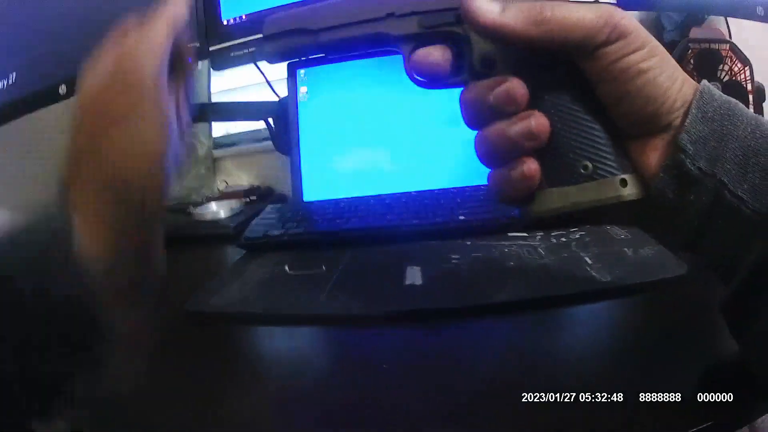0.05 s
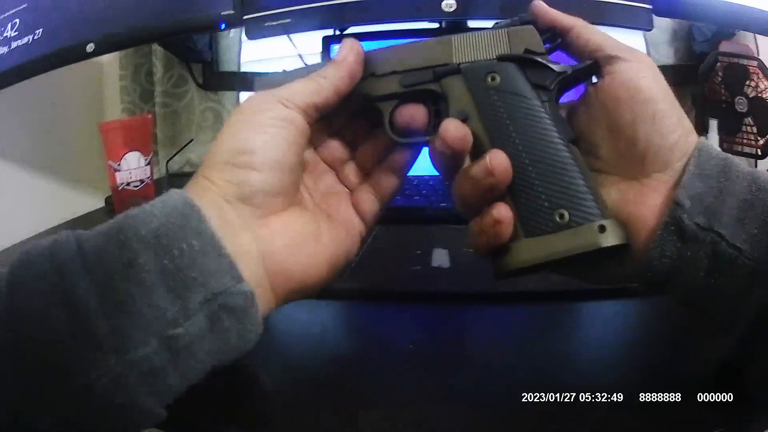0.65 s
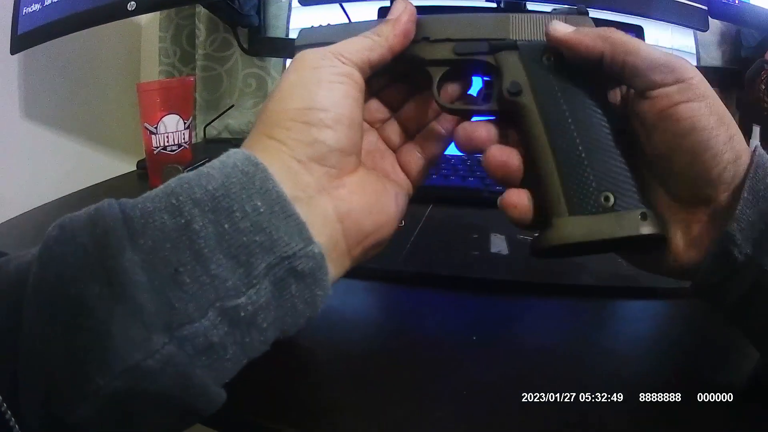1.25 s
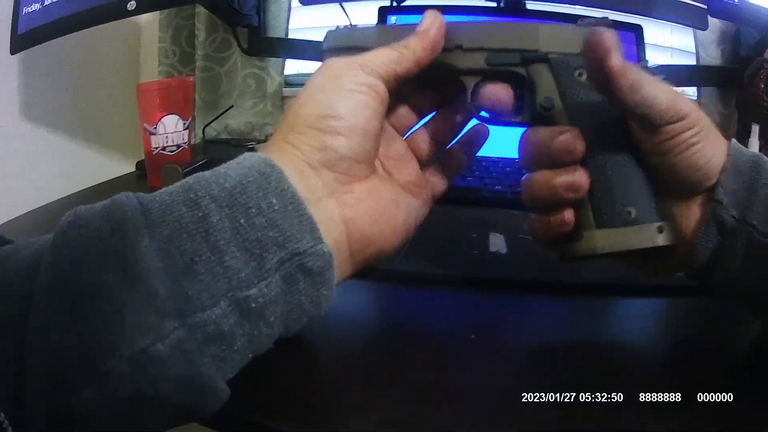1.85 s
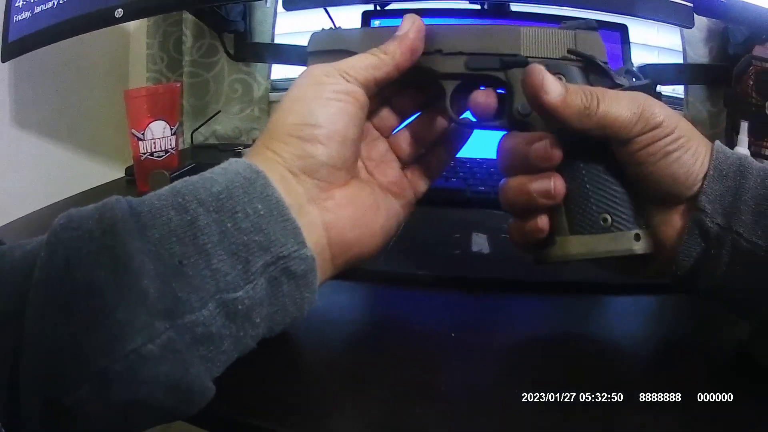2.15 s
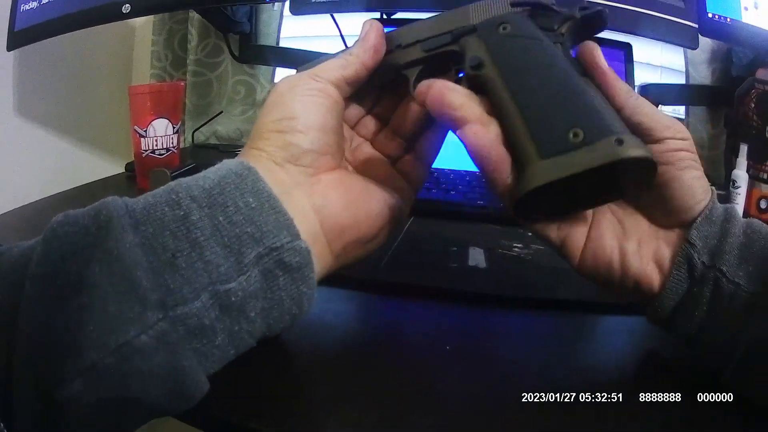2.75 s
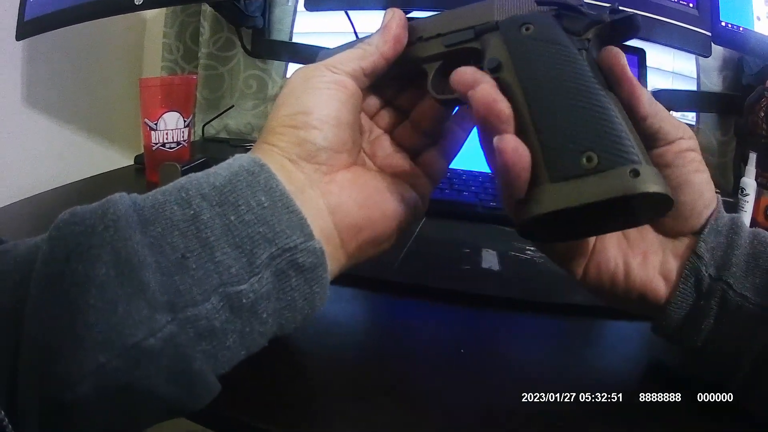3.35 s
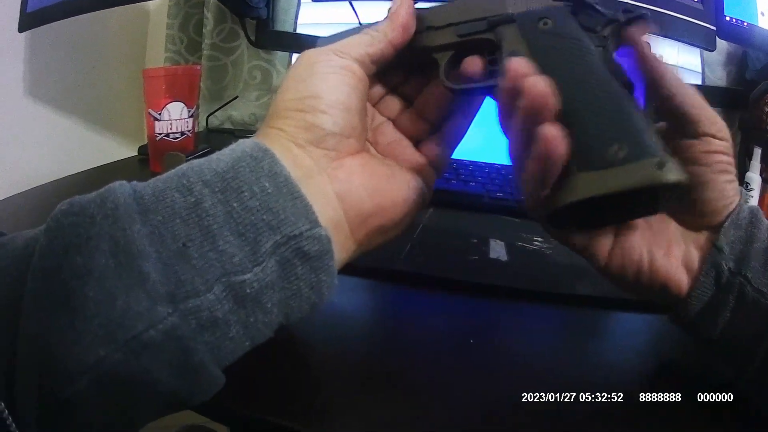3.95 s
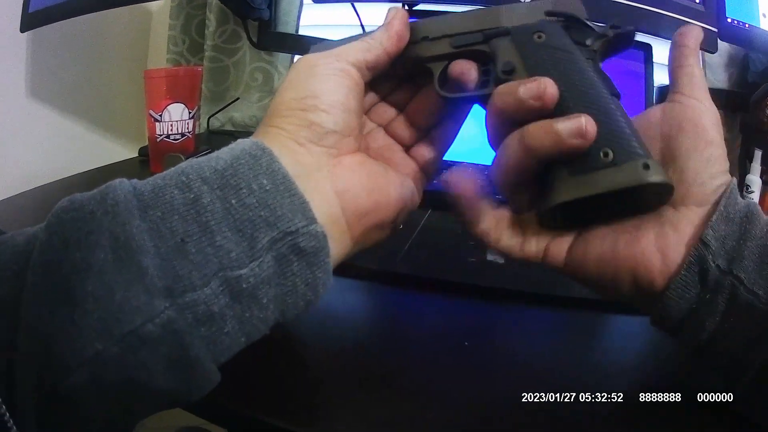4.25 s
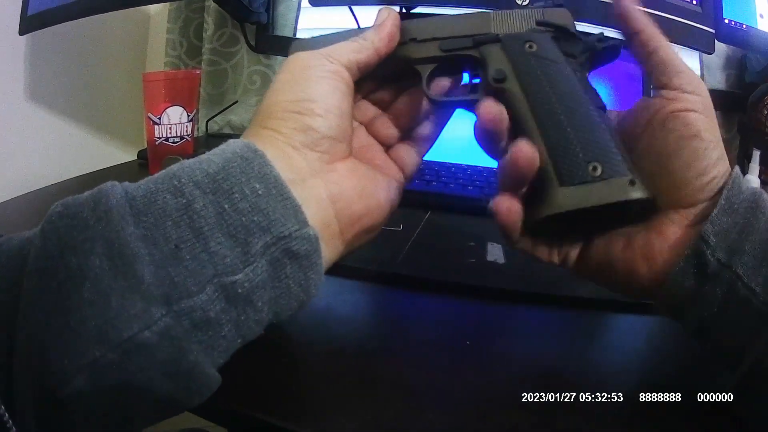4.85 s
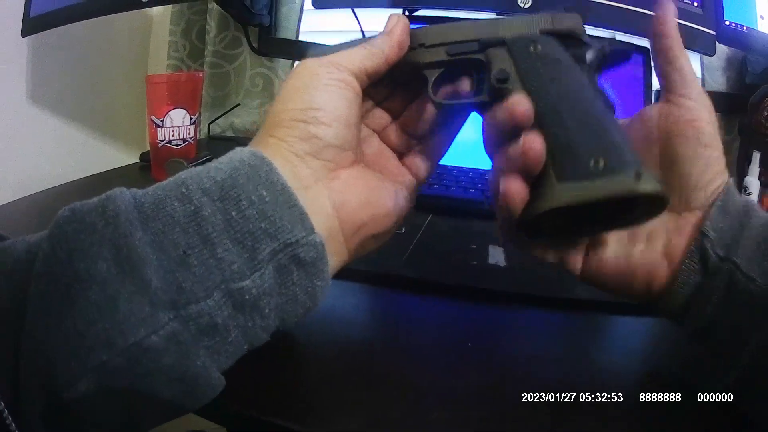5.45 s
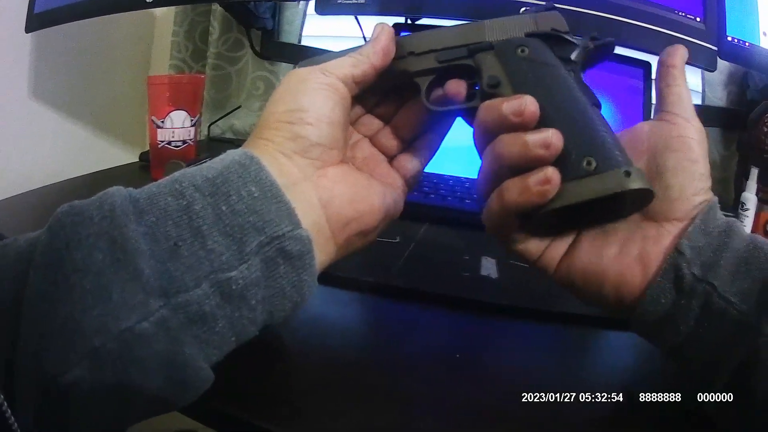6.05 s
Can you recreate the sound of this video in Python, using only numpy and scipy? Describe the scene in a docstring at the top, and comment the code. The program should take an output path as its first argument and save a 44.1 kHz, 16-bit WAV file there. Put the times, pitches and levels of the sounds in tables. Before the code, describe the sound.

Indoors, a handgun's slide crashes forward so near the microphone that it briefly overloads. The hammer is drawn back with a faint high squeak, and two hard snaps come with a little spring twang between them. Small metal parts keep clicking and ticking unevenly, with soft rubbing of fingers and cloth. Near the end another snap cracks out, trailed by light ticks. A low electrical hum and soft room noise continue throughout.

```python
"""A steel pistol is worked by hand close to a small camera, over a faint mains hum and the rush of a room.
First the slide slams home and bounces; the impact overloads the microphone and sets the room ringing.
Then the hammer is thumbed back with a thin squeak, a spring twangs, and the hammer drops.
Safety, trigger and magazine tick as the grip shifts; one more blow falls near 5.2 s, then a few ticks.
Each impact excites damped modes of the steel; friction of skin, cloth and metal gives the noise between."""
import sys
import numpy as np
from scipy import signal
from scipy.fft import rfft, irfft
from scipy.io import wavfile
from scipy.ndimage import uniform_filter1d

SR = 44100
rng = np.random.default_rng(int(sys.argv[2]) if len(sys.argv) > 2 else 0)


def dump_mix(stems):
    """Bounce the given channels to the path in sys.argv[1] as a 16-bit WAV at rate SR."""
    frames = np.atleast_2d(stems).T  # one column per channel
    limited = np.clip(frames, -1, 1)  # hard clip at full scale
    pcm = np.round(limited * 32767).astype(np.int16)
    wavfile.write(sys.argv[1], SR, pcm)


N = 269230
TIME = np.arange(N) / SR
SHORT = TIME[:SR // 8]   # time axis of one impact
CUTOFF_HZ = 12900


def from_db(db):
    """Amplitude ratio of a level in decibels."""
    return 10 ** (np.asarray(db) / 20)

def unit_energy(x):
    """Normalisation to an energy of one."""
    return x / np.sqrt(np.sum(x ** 2) + 1e-20)

def at_hz(points, hz):
    """Interpolation on a logarithmic frequency axis."""
    f, value = np.transpose(points)
    return np.interp(np.log(np.maximum(hz, 1)), np.log(f), value)

def add(out, s, sound):
    """Superposition of a sound that starts at s seconds."""
    i = max(round(s * SR), 0)
    out[i:i + len(sound)] += sound[:N - i]

def noise(spectrum, size):
    """Spectral shaping of white noise, scaled to an rms of one."""
    gain = from_db(at_hz(spectrum, np.fft.rfftfreq(size, 1 / SR)))
    x = irfft(rfft(rng.standard_normal(size)) * gain, size)
    return x / np.std(x)

def roughness(size, grain_samples):
    """Surface roughness as a moving average of noise, with an rms of one."""
    x = uniform_filter1d(rng.standard_normal(size), size=grain_samples)
    return x / np.std(x)

def decay(t60, t=SHORT):
    """Exponential damping: 60 dB in t60 seconds."""
    return np.exp(-np.log(1000) * t / max(t60, 1e-3))

def onset(rise_s):
    """Finite contact time: the force builds over a fraction of a millisecond."""
    return 1 - np.exp(-(SHORT / rise_s) ** 2)

def ring(modes, spread_db, detune):
    """Modal superposition; grip and point of contact vary each mode's strength and pitch."""
    out = np.zeros(len(SHORT))
    for hz, db, t60 in modes:
        strength, shift, phase = rng.uniform(-1, 1, 3)
        mode = np.sin(2 * np.pi * hz * (1 + detune * shift) * SHORT + np.pi * phase)
        out += from_db(db + spread_db * strength) * decay(t60) * mode
    return unit_energy(out)

def crack(spectrum, t60):
    """Modal overlap: countless high modes merge into noise, damped by the hands in milliseconds."""
    return unit_energy(noise(spectrum, len(SHORT)) * decay(t60))


# mains harmonics: f/Hz, rms level/dB
MAINS_LINES = [(119.9, -46.5), (239.8, -61.5), (359.7, -71)]

def hum():
    """Electrical interference: the electronics pick up harmonics of the mains."""
    return sum(np.sqrt(2) * from_db(db) * np.sin(2 * np.pi * (hz * TIME + rng.random()))
               for hz, db in MAINS_LINES)

# ambient spectrum: f/Hz, relative density level/dB
AIR_SPECTRUM = [(20, -15), (42, -2.5), (65, -6), (100, -5.5), (180, 0), (260, -4), (400, -9), (600, -10.5),
                (1000, -17), (2200, -20.5), (4000, -30.5), (8000, -29), (12500, -30)]

def room_rush(rms_db=-59.5):
    """Stationary noise: the soft, low rush of the room."""
    return from_db(rms_db) * noise(AIR_SPECTRUM, N)

# reverberation time: f/Hz, t60/s
ROOM_T60 = [(200, 0.32), (900, 0.74), (2000, 0.71), (4500, 0.64), (8000, 0.61), (13000, 0.31)]
# spectrum of the tail at its start: f/Hz, relative level/dB
ROOM_SPECTRUM = [(100, 2.5), (400, 1), (1000, -1), (2200, 1.5), (4500, -2), (8000, -3), (13000, 2.5)]

def room_tail(build_s=0.0059):
    """Diffuse field: each band decays at its own rate, and the middle outlasts bass and treble."""
    t = TIME[:SR]
    hz = np.fft.rfftfreq(SR, 1 / SR)
    spectrum = rfft(rng.standard_normal(SR)) * from_db(at_hz(ROOM_SPECTRUM, hz))
    edges = np.linspace(np.sqrt(60), np.sqrt(CUTOFF_HZ), num=17) ** 2
    response = np.zeros(SR)
    for low, high in zip(edges, edges[1:]):
        band = irfft(spectrum * ((hz >= low) & (hz < high)), SR)
        response += band * decay(at_hz(ROOM_T60, np.sqrt(low * high)), t)
    return unit_energy(response * (1 - np.exp(-t / build_s)))

# early reflections off desk and screen: delay/s, level/dB re the direct sound
REFLECTIONS = [(0.0103, -24), (.0245, -28), (0.0274, -33.5)]

def room(direct, directions=3, tail_db=-21.5):
    """Reflection and reverberation; the gun radiates differently each way, which smooths the tail."""
    out = direct.copy()
    for delay, db in REFLECTIONS:
        add(out, delay, from_db(db) * direct)
    radiated = [(blows() + clicks()) / np.sqrt(directions) for _ in range(directions)]
    tail = sum(signal.fftconvolve(x, room_tail())[:N] for x in radiated)
    return out + from_db(tail_db) * tail

# shifts of the grip: start t/s, end t/s, finger level/dB, sleeve level/dB
GRIP_SHIFTS = [(0, .2, -42.5, -57), (0.582, 0.86, -60.5, -55), (1.004, 1.704, -62, -70.5),
               (2.41, 2.437, -53.5, -62), (4.5, 4.672, -63.5, -72), (5.745, 6.105, -74.5, -59)]

def movement(part, rest_db, fade_db_per_s):
    """Friction follows motion: its gain swells into each shift, holds, and sinks back to rest."""
    level_db = np.full(N, rest_db)
    for start, end, finger_db, sleeve_db in GRIP_SHIFTS:
        held_db = {"fingers": finger_db, "sleeves": sleeve_db}[part]
        away_s = np.abs(TIME - np.clip(TIME, start, end))
        level_db = np.maximum(level_db, held_db - fade_db_per_s * away_s)
    return from_db(level_db)

# brushing cloth: f/Hz, relative density level/dB
SLEEVE_SPECTRUM = [(100, -32), (300, -10.5), (400, 4), (550, -12.5), (1500, -25), (6000, -44)]

def sleeves():
    """Friction of soft cloth: low noise as the arms move."""
    return movement("sleeves", rest_db=-66.5, fade_db_per_s=66) * noise(SLEEVE_SPECTRUM, N)

# squeak as the hammer is thumbed back: t/s, f/Hz, level/dB
SQUEAK_PATH = [(0.50, 8800, -94), (0.54, 9600, -60.5), (0.61, 11300, -66.5), (0.68, 10900, -75),
               (0.75, 11450, -68), (0.80, 10300, -62), (0.86, 10750, -58.5), (0.89, 10750, -100)]

def squeak(grain, waver=0.00824):
    """Frequency modulation: the grain of the friction makes one thin tone waver."""
    s, hz, db = np.transpose(SQUEAK_PATH)
    pitch = np.interp(TIME, s, hz) * (1 + waver * grain)
    envelope = np.interp(TIME, s, from_db(db), left=0, right=0)
    return envelope * np.sin(2 * np.pi * np.cumsum(pitch) / SR)

# skin rubbing on the gun: f/Hz, relative density level/dB
RUB_SPECTRUM = [(200, -11.5), (700, -7.5), (1050, 4), (1400, -12), (2300, 0.5), (3500, -5), (7000, -6.5),
                (10000, -13), (13000, -26.5)]

def fingers(grain_db=2):
    """Friction of skin: one roughness modulates the amplitude of both rub and squeak."""
    grain = roughness(N, grain_samples=130)
    rub = movement("fingers", rest_db=-69.5, fade_db_per_s=158) * noise(RUB_SPECTRUM, N)
    return from_db(grain_db * grain) * (rub + squeak(grain))

# steel meeting steel, also in twangs and clicks: f/Hz, relative density level/dB
CONTACT_SPECTRUM = [(150, -25.5), (400, -12.5), (1800, -20.5), (3500, -11.5), (5500, -1.5), (6800, 7),
                    (9000, 1.5), (12000, -0.5), (15000, -13.5)]
# parts sliding on each other: start t/s, end t/s, level/dB before the grit
SCRAPES = [(2.385, 2.437, -53.5), (4.607, 4.64, -51)]

def scrapes(grit_db=9.0):
    """Sliding friction of steel on steel: a short, gritty hiss."""
    out = np.zeros(N)
    for start, end, db in SCRAPES:
        size = max(round((end - start) * SR), 200)
        gain = from_db(db + grit_db * roughness(size, grain_samples=40))
        add(out, start, gain * noise(CONTACT_SPECTRUM, size) * signal.windows.tukey(size))
    return out

def lead_in_hiss(lead_s=0.0026, click_hiss_db=-23.0, blow_hiss_db=-30):
    """Exponential growth: a brief, faint hiss swells just ahead of each click and blow."""
    out = np.zeros(N)
    for events, hiss_db in ((CLICKS, click_hiss_db), (BLOWS, blow_hiss_db)):
        for s, db, *_ in events:
            swell = crack(CONTACT_SPECTRUM, t60=5 * lead_s)[:round(s * SR)][::-1]
            add(out, s - len(swell) / SR, from_db(db + hiss_db) * swell)
    return out

# modes of the spring: f/Hz, relative level/dB, t60/s
SPRING_MODES = [(1050, -8.5, 0.11), (2600, -7.5, 0.088), (4400, 6.5, 0.026), (5850, 6.5, 0.033),
                (6700, -22, 0.048), (8200, 3, 0.037), (9500, -9, 0.087)]
# a part settles against the spring: t/s, energy level/dB, ring level/dB re the tick
TWANGS = [(1.0421, 3, 4), (2.8414, -8, 9)]

def twangs():
    """Free vibration: a bright tick leaves a spring ringing briefly."""
    out = np.zeros(N)
    for s, db, ring_db in TWANGS:
        tick = crack(CONTACT_SPECTRUM, t60=0.01)
        spring = from_db(ring_db) * ring(SPRING_MODES, spread_db=0.5, detune=.002)
        add(out, s, from_db(db) * unit_energy((tick + spring) * onset(rise_s=0.00034)))
    return out

# modes of the frame (also struck in blows) and of the slide: f/Hz, relative level/dB, t60/s
FRAME_MODES = [(404, -15, 0.022), (685, -14.5, 0.022), (949, 2, 0.019), (1094, -4.5, 0.0297),
               (1460, -11.5, 0.019)]
SLIDE_MODES = [(3060, -1, 0.013), (3430, -2, 0.021), (3830, -3.5, 0.011), (3900, -4, 0.015),
               (4258, 0, 0.015), (4520, 0, 0.014), (5130, -2, 0.0083), (5675, -4, 0.008)]
# modes of a lever: multiple of its pitch, relative level/dB, t60/s
LEVER_MODES = [(.9, -7, .007), (1, 0, 0.018), (1.12, -1.5, 0.0081)]
# kinds of contact, levels re the crack: name -> lever level/dB, lever f/Hz, slide level/dB
# catch: drops into a notch; latch: snaps over; ping: hits a stop and rings; press: same, under a finger;
# release: springs back with a dry tick; clink: loose steel; tap: soft and dull
CONTACTS = {"catch": (-10, 2430, -1.1), "latch": (-6.5, 4330, -4.5), "ping": (-4.5, 2490, -9.5),
            "press": (-11, 2490, -9.5), "release": (-16, 2600, -10), "clink": (2.7, 2600, 5.6),
            "tap": (9.72, 1545, 12)}

def contact(kind, knock_db):
    """Partition of energy: one light impact is shared among frame, lever, slide and a bright crack."""
    lever_db, lever_hz, slide_db = CONTACTS[kind]
    lever_modes = [(multiple * lever_hz, db, t60) for multiple, db, t60 in LEVER_MODES]
    knock = from_db(knock_db) * ring(FRAME_MODES, spread_db=0.0, detune=0.05)
    lever = from_db(lever_db) * ring(lever_modes, spread_db=5.5, detune=0.041)
    slide = from_db(slide_db) * ring(SLIDE_MODES, spread_db=5.0, detune=0.086)
    snap = crack(CONTACT_SPECTRUM, t60=.014)
    return unit_energy((knock + lever + slide + snap) * onset(rise_s=0.00088))

CLICKS = [(0.074, -7, -18, "catch", None), (0.398, -18, 17, "tap", None), (0.6174, -8, -8.5, "clink", None),
          (0.8801, 12, -17, "latch", None), (1.8216, -9, 0, "catch", None),
          (1.8635, -9.5, -7.5, "release", .008), (1.985, -2.5, -8.5, "press", None),
          (2.0749, -7, -4.5, "press", .004), (2.178, -10, -13.5, "release", None),
          (2.253, -3.5, -9.5, "release", 0.0036), (2.3705, -20, 17, "tap", None),
          (2.3836, -1.5, -10, "catch", None), (2.3996, -2, -6, "catch", None),
          (2.699, 4, -1, "catch", 0.0079), (2.8403, 0, -10, "latch", None),
          (2.912, 10, -3, "catch", 0.0051), (3.0479, -6.5, 5, "catch", None),
          (3.3692, -12, -13.5, "release", 0.0081), (3.485, -13, -8.5, "ping", None),
          (3.582, -8.5, -13.5, "press", 0.0052), (3.691, -1.5, -16.5, "ping", None),
          (3.7441, -6, -12.5, "release", 0.0066), (3.8525, -22, -4, "clink", None),
          (3.8838, -8, -16.5, "ping", None), (3.9277, -8.5, -1, "clink", None),
          (4.2826, -13, -12.5, "press", .011), (4.3143, -19, -7, "tap", None),
          (4.4004, -2.5, -12.5, "ping", None), (4.4756, -5.5, -12.5, "release", 0.0082),
          (4.5767, 1, -18, "press", None), (4.6291, -5, -15, "release", None),
          (4.6586, -19, -8, "tap", None), (4.7593, -2.5, -19, "release", None),
          (5.1173, -31.5, 19, "tap", None), (5.6687, -10.5, -11, "catch", 0.011),
          (5.7968, -7, -12.5, "ping", None), (5.86, -8.5, -24, "release", None),
          (5.8817, -11, -10.5, "catch", 0.0093), (6.019, -20.5, -4, "catch", None)]

def clicks(first_touch_db=-11, first_touch_slope=0.44):
    """Impact with backlash: sear, safety and trigger catch; a part with free play touches lightly first."""
    out = np.zeros(N)
    for s, db, knock_db, kind, play_s in CLICKS:
        add(out, s, from_db(db) * contact(kind, knock_db))
        if play_s:
            add(out, s - play_s, from_db(first_touch_db + first_touch_slope * db) * contact(kind, knock_db))
    return out

# modes of the hammer, the whole gun and the low thud under each blow: f/Hz, relative level/dB, t60/s
HAMMER_MODES = [(1660, -0.5, 0.015), (1880, -8.5, .008), (2170, -1, 0.013), (2383, -4, 0.031),
                (2650, 5, 0.012), (3490, -0.5, 0.015)]
STEEL_MODES = [(875, -20, .14), (3330, -8, .04), (3392, -1, .07), (3460, -9, .04), (3920, -13, .06),
               (4135, -11, .06), (4298, -12, .06), (4629, -11, .06), (4860, -12, .06), (5110, -13, .06),
               (5340, -13, .06), (6130, -13, .06), (6371, -12, .06), (7330, -13, .06), (8130, -14, .06),
               (9440, -12, .06), (10038, -13, .07), (11670, -16, .06)]
THUD_MODES = [(60, -15, 0.0093), (242, 0.5, 0.027), (350, -8.5, 0.004), (500, -2, 0.011)]
# crack of a hard blow: f/Hz, relative density level/dB
BLOW_SPECTRUM = [(30, -27.5), (150, -17), (400, -17.5), (1400, -15), (2300, -12.5), (3500, 2), (6000, 4.5),
                 (9500, 3), (12500, -2), (15000, -21)]
# slide and hammer blows: t/s, energy level/dB of the first contact, number of contacts,
# knock, hammer and steel level/dB re the first crack, crack t60/s, crack tilt/(dB per octave)
BLOWS = [(0.1108, 35.1, 3, -21.5, -26.5, -13, .010, -0.89), (0.1359, 15.5, 1, -16, -19.5, -11, .02, -0.2),
         (0.932, 21.4, 3, -14, -12.5, -33.5, 0.0081, -0.33),
         (1.3757, 23.5, 1, -21.5, -11, -31.5, 0.012, 2.8),
         (5.1639, 20.4, 1, -19.5, -14.5, -39.5, 0.014, 2.6)]

def blows(bounce_s=.0039, bounce_loss_db=6, crack_loss_db=3.5, thud_db=-27):
    """Inelastic impact of the spring-driven slide and hammer: each rebound is weaker, with less crack."""
    out = np.zeros(N)
    for s, first_db, contacts, knock_db, hammer_db, steel_db, t60, tilt_db in BLOWS:
        spectrum = [(hz, db + tilt_db * np.log2(hz)) for hz, db in BLOW_SPECTRUM]
        for k in range(contacts):
            snap = from_db(-k * crack_loss_db) * crack(spectrum, t60)
            knock = from_db(knock_db) * ring(FRAME_MODES, spread_db=3.5, detune=0.0055)
            hammer = from_db(hammer_db) * ring(HAMMER_MODES, spread_db=4.0, detune=0.033)
            steel = from_db(steel_db) * ring(STEEL_MODES, spread_db=3.0, detune=0.004)
            thud = from_db(thud_db) * ring(THUD_MODES, spread_db=1.5, detune=0.05)
            impact = unit_energy((snap + knock + hammer + steel + thud) * onset(rise_s=0.00016))
            add(out, s + k * bounce_s, from_db(first_db - k * bounce_loss_db) * impact)
    return out


def scene():
    """Superposition in one channel: the gun in its room, fingers, sleeves and the room's rush."""
    gun = blows() + clicks() + twangs() + lead_in_hiss() + scrapes()
    return (room(gun) + fingers() + sleeves() + room_rush())[None]

def gain_control(x, threshold_db=-6.0, max_cut_db=4.0, release_db_per_s=47.5, attack_s=0.0043):
    """Dynamic compression: the gain ducks just after a loud blow and creeps back."""
    power = uniform_filter1d(x ** 2, size=44)
    level_db = 10 * np.log10(np.maximum(power, 1e-12))
    over_db = np.clip(level_db - threshold_db, 0, max_cut_db)
    release_db = release_db_per_s * TIME
    cut_db = np.maximum.accumulate(over_db + release_db, axis=-1) - release_db
    pole = np.exp(-1 / (attack_s * SR))
    return x * from_db(-signal.lfilter([1 - pole], [1, -pole], cut_db))

def record(dry):
    """Clipping: the gain ducks too late to stop an overload; hum is added and a low-pass cuts the top."""
    clipped = np.clip(gain_control(dry) + hum(), -.8, .8)
    return signal.sosfilt(signal.ellip(10, .2, 70, CUTOFF_HZ, fs=SR, output="sos"), clipped)


dry = scene()
out = record(dry)
dump_mix(out)
```